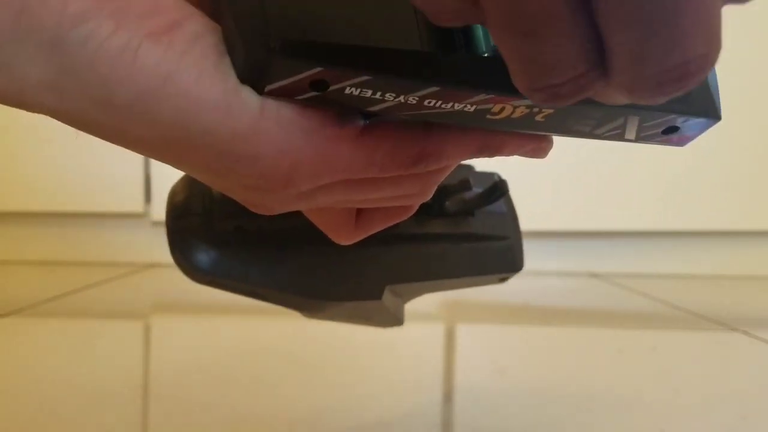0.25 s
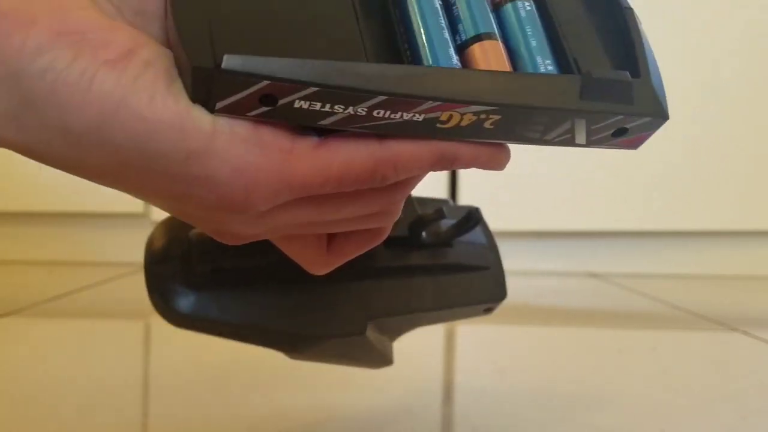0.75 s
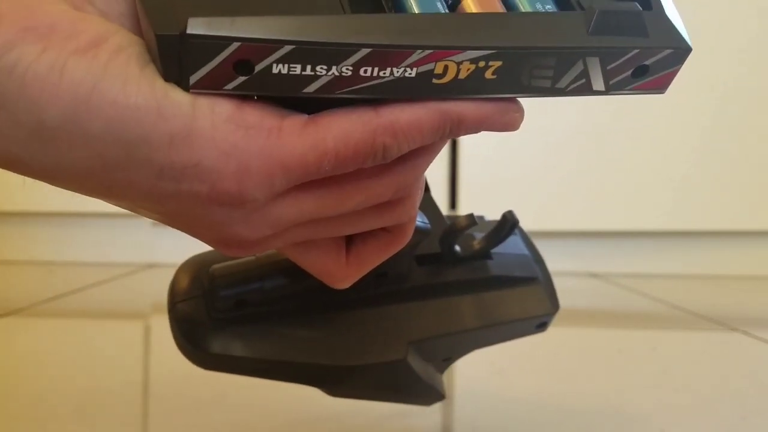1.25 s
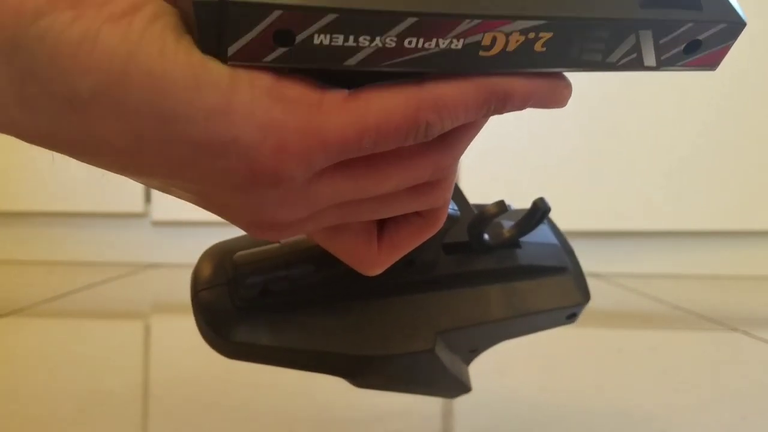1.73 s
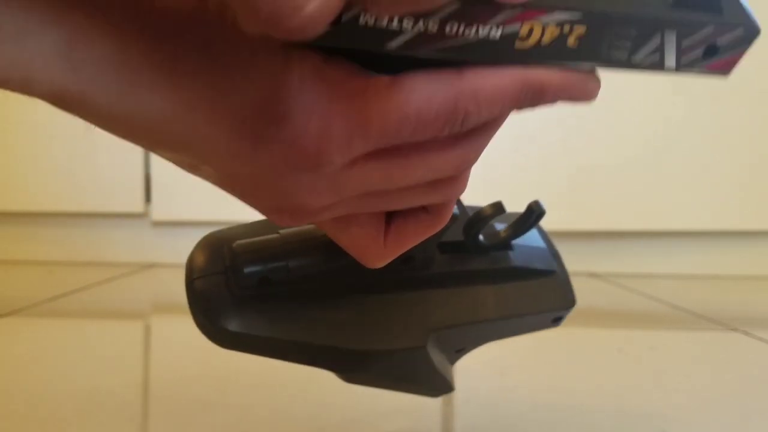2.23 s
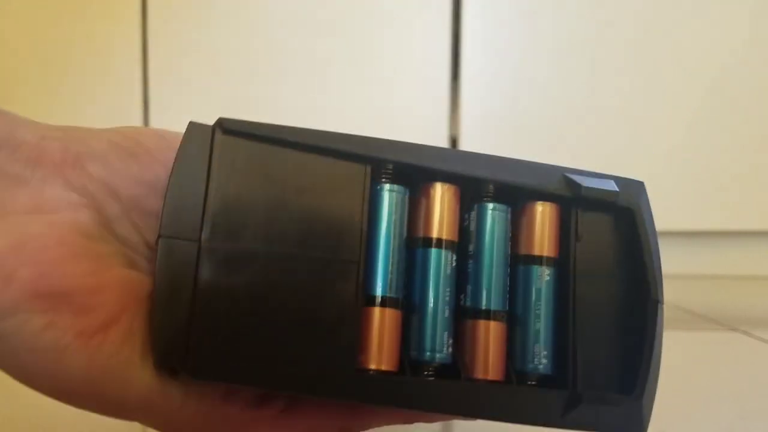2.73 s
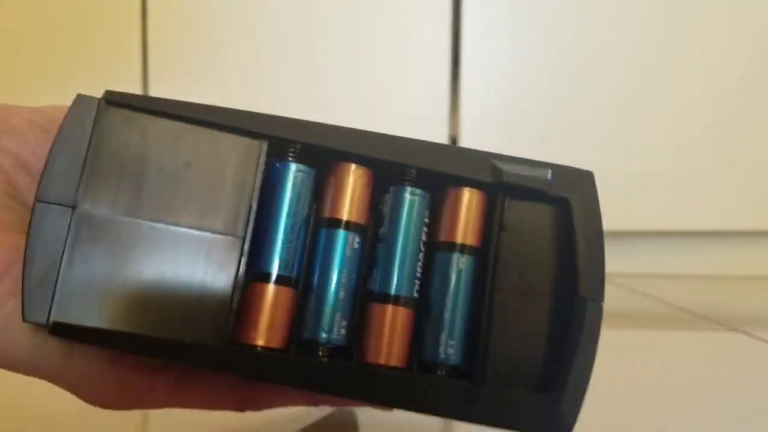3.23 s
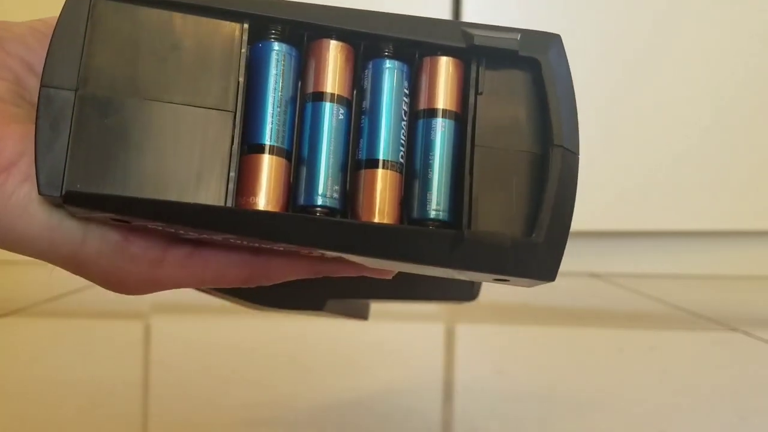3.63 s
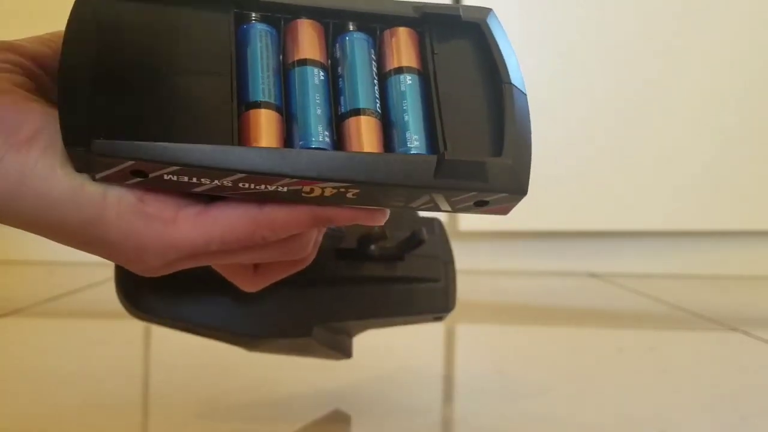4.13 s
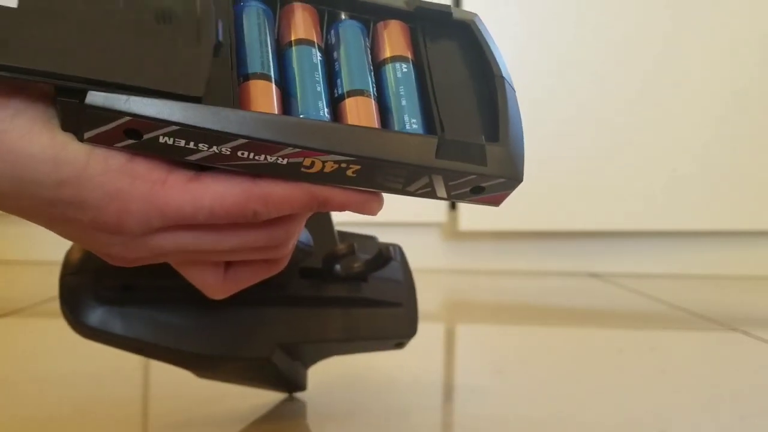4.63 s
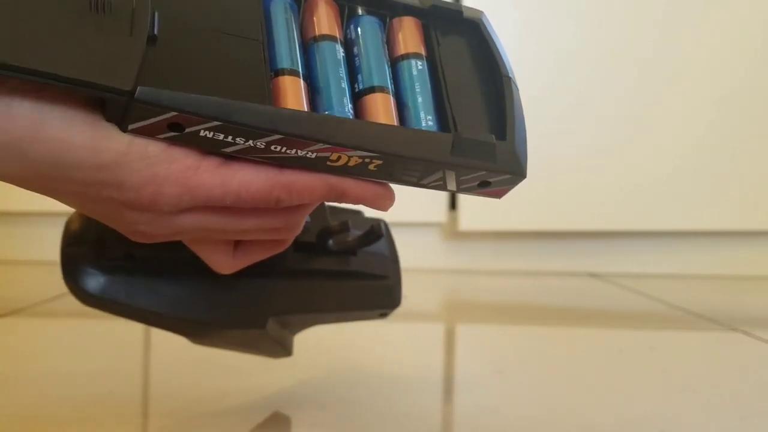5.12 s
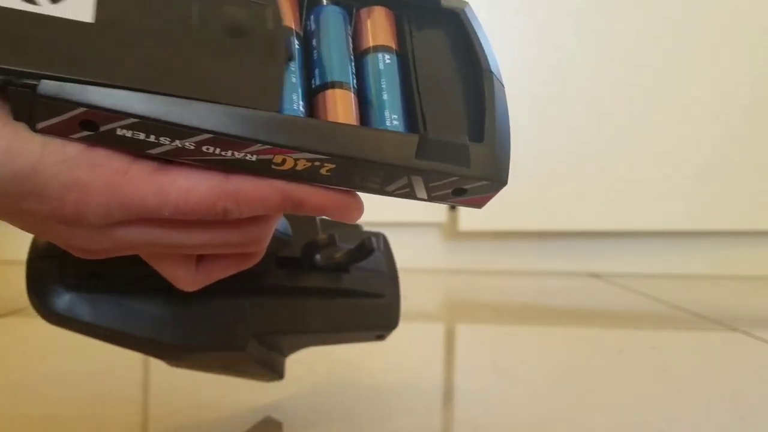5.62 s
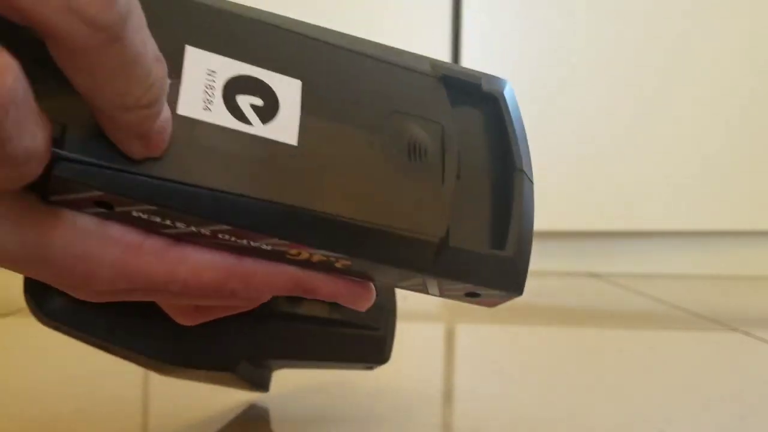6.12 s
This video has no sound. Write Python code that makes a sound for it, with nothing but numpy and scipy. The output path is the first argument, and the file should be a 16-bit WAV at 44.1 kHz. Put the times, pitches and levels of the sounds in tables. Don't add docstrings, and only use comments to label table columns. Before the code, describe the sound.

Hands press cells into a thin plastic handheld shell indoors. Hard dry clatter fills the first half second, then a near-silent gap with faint rubbing. Another burst of hollow clicks comes just after two seconds, then scattered small taps and scrapes, ending with a muted cluster as the cover slides and clicks. Close microphone, short room echo, soft hiss, low hum and distant engine drone.

```python
import sys
import numpy as np
from scipy import signal
from scipy.fft import rfft, irfft, next_fast_len
from scipy.io import wavfile
from scipy.ndimage import uniform_filter1d

SR = 44100
rng = np.random.default_rng(int(sys.argv[2]) if len(sys.argv) > 2 else 0)


def transcribe(signal):
    frames = np.atleast_2d(signal).T
    limited = np.clip(frames, -1, 1)
    pcm = np.round(limited * 32767).astype(np.int16)
    wavfile.write(sys.argv[1], SR, pcm)


def boost_factor(decibels):
    exponent = np.asarray(decibels, float) / 20
    return 10 ** exponent


N = 280781
HALVES = np.array([[0.5], [-0.5]])


def evened(x):
    return x / np.sqrt(np.mean(x ** 2) + 1e-20)


def levelled(x, span):
    return x / np.sqrt(np.mean(x[:, :span] ** 2))


def read(points, hz):
    f, value = np.transpose(points)
    return np.interp(np.log(hz + 1), np.log(f + 1), value)


def coloured(x, points):
    size = next_fast_len(x.shape[-1])
    gain = boost_factor(read(points, np.fft.rfftfreq(size, 1 / SR)))
    return irfft(rfft(x, size) * gain, size)[..., :x.shape[-1]]


# freq_hz, level_db (per Hz)
AIR = [(12, -41.5), (22, -15.5), (50, -2.5), (114, -0.5), (145, -7.5), (192, -2.5), (420, -14), (740, -16),
       (974, -11.5), (1600, -21), (2300, -27), (4000, -29), (4500, -37), (6500, -39), (11000, -47),
       (14500, -44)]
# freq_hz, likeness (-1..1)
SAME = [(60, 0.98), (130, 0.97), (290, 0.94), (640, 0.61), (1410, -0.014), (3100, -0.06), (6820, 0.24),
        (15000, -0.94)]
# time_s, level_db
RUMBLE = [(0, -56), (1.0, -61), (1.6, -61.5), (1.95, -66.5), (2.6, -60.5), (3.3, -63), (3.9, -64),
          (4.3, -60), (4.85, -63.5), (5.3, -62), (5.9, -63.5), (6.37, -63.5)]
# freq_hz, width_hz, level_db
HUM = [(100, 12, 0.5), (182, 25, 2)]
# time_s, pitch_hz, level_db (over the hum)
DRONE = [(0, 60, 9), (.5, 62, 9), (1.0, 72, 10), (1.5, 70, 10), (1.9, 66, 4), (2.3, 72, 8), (3.1, 64, 8),
         (3.6, 66, 3), (4.3, 56, 7), (4.8, 70, 7), (5.2, 88, 8), (5.5, 66, 5), (6.37, 63, 7)]
AIR_DB, DRONE_WIDTH_HZ, HOP = -58.5, 7, 512


def air():
    frames, hz = N // HOP + 5, np.fft.rfftfreq(2048, 1 / SR)
    frame_s = np.arange(frames) * HOP / SR
    a, b, c, d, patches = rng.standard_normal((frames, 1025, 5)).T
    patches = evened(uniform_filter1d(uniform_filter1d(patches, 20, 0), 7, 1))

    same = np.clip(read(SAME, hz), -1, 1)[:, None]
    left, other = a + 1j * b, c + 1j * d
    z = np.array([left, same * left + np.sqrt(1 - same ** 2) * other])

    time_s, level_db = np.transpose(RUMBLE)
    sway_db = np.interp(frame_s, time_s, level_db - level_db.mean())
    low = 1 / (1 + (hz[:, None] / 200) ** 2)
    hum_db = sum(db / (1 + ((hz - f) / width) ** 2) for f, width, db in HUM)

    time_s, pitch_hz, level_db = np.transpose(DRONE)
    pitch_hz = np.interp(frame_s, time_s, pitch_hz)
    level_db = np.interp(frame_s, time_s, level_db)
    drone_db = 0.6 * level_db / (1 + ((hz[:, None] - pitch_hz) / DRONE_WIDTH_HZ) ** 2)

    z *= boost_factor((read(AIR, hz) + hum_db)[:, None] + drone_db + 1.5 * patches + low * sway_db)
    noise = signal.istft(z, nperseg=2048, noverlap=2048 - HOP)[1][:, :N]
    return boost_factor(AIR_DB) * evened(noise)


def drone():
    time_s, pitch_hz, level_db = np.transpose(DRONE)
    t = np.arange(N) / SR
    drift, swell = (np.interp(t, np.arange(64) / 8, v) for v in rng.standard_normal((2, 64)))
    turns = np.cumsum(np.interp(t, time_s, pitch_hz) + 1.5 * drift) / SR
    return boost_factor(-71 + np.interp(t, time_s, level_db) + 2.5 * swell) * np.sin(2 * np.pi * turns)


# peak_s, level_db
GRIPS = [(0.02, -64), (1.35, -65), (2.52, -67), (3.27, -65.5), (3.72, -67), (3.96, -62.5), (4.24, -64.5),
         (4.64, -65), (5.3, -66.5), (5.8, -68), (6.27, -63)]
TIGHTEN_DB_PER_S, SETTLE_DB_PER_S, REST_DB = 45, 55, -84


def grip_db(t):
    peak_s, level_db = np.transpose(GRIPS)[:, :, None]
    slope = np.where(t < peak_s, TIGHTEN_DB_PER_S, SETTLE_DB_PER_S)
    return np.maximum((level_db - slope * abs(t - peak_s)).max(0), REST_DB)


# freq_hz, level_db (per Hz)
RUB = [(180, -33.5), (300, -3.5), (860, -5), (2100, -10.5), (4000, -15), (4600, -21.5), (7500, -27.5),
       (11000, -34), (14500, -27)]


def rubs():
    slips = boost_factor(2.5 * np.minimum(rng.exponential(1, N), 5)) * (rng.random(N) < 2500 / SR)
    grain = np.sqrt(abs(uniform_filter1d(slips ** 2, 60)) + 1e-9)
    x = evened(coloured(rng.standard_normal((2, N)) * grain, RUB))
    return boost_factor(grip_db(np.arange(N) / SR) + 0.5) * x


def rings(modes, struck_hz, t, chance, spread, focus_db):
    f, width, db, pan_db, lead = np.transpose(modes)[:, :, None]
    f = f * (1 + 0.015 * chance[0])
    off_octaves = abs(np.log2(f / struck_hz))
    size = boost_factor(db - focus_db * off_octaves + 3.4 * chance[1]) * np.exp(-np.pi * width * t)
    side = HALVES[:, :, None]
    turn = 2 * np.pi * f * t + side * (lead + spread * chance[3])
    return (size * boost_factor(side * (pan_db + 1.2 * chance[2])) * np.sin(turn)).sum(1)


# freq_hz, width_hz, level_db, left_right_db, left_lead_rad
SHELL = [(1060, 220, -5.5, 9, 1.9), (1530, 170, -4, 3.5, 2.7), (2020, 98, -6, 1.3, 0.54),
         (2300, 170, -1.45, 0, .3), (2560, 200, -5.5, -1, .4), (2880, 90, -10, -4, 0.86),
         (3060, 1000, -11, 0, 1.2), (3670, 300, -13.5, 7, 4.8), (4860, 280, -17.5, 6, 1.6)]
# freq_hz, width_hz, level_db, left_right_db, left_lead_rad
CAVITY = [(300, 240, -3.5, 0.1, .15), (493, 110, 0.5, 0.1, 1.8), (814, 280, 4, 1.4, 1.3)]
# freq_hz, level_db (per Hz)
TICK = [(2060, -25), (3500, -1.5), (4060, -1), (4570, -7), (5000, -5.5), (6050, -10), (8340, -9.5),
        (11000, -21.5), (14500, -17)]
# freq_hz, level_db
RADIATES = [(60, -36), (180, -11), (330, -5), (4500, -2.5), (7000, -12), (15000, -27)]
# time_s, left_right_db
HANDS = [(0.18, 0.5), (0.414, 4), (0.62, -0.5), (1.24, -6), (2.0, 0.5), (3.1, -1), (3.244, 4.5), (3.6, 1.0),
         (3.83, 15.5), (4.75, -1), (5.2, -2.5), (5.68, 5), (6.367, 0)]
# start_s, hollow_db, grit_db, sheen_db (above 8 kHz)
SHADES = [(0, 2, 1, 4), (.21, 0, -1, 4), (.3, 4, 2, -2), (.322, -2, -1, 2), (.342, 3, 0, 0),
          (.39, -1, -1, 2), (.41, 0, -3, 7), (.5, -3, -11, 5), (.53, 0, -1, -2), (.545, 0, 3, 0),
          (.565, -2, 4, 0), (.58, 2, 5, -5), (.7, 0, 0, 0), (1.1, 1, -1, 6), (2.0, 0, 2, -5),
          (2.05, 2, 0, 3), (2.1, 0, 1, 4), (2.13, 1, -1, 3), (2.16, 4, 0, 2), (2.2, 0, -9, 9),
          (2.276, 0, 0, -1), (2.33, 2, -2, -1), (2.44, -8, 2, -2), (2.49, 1, 5, -5), (3.0, 0, 7, -12),
          (3.18, 0, 2, 1), (3.6, 0, -3, -2), (3.7, -3, 0, 0), (3.9, -8, 0, 0), (3.93, 0, 0, 1),
          (4.2, -2, 4, -7), (4.24, 1, -8, 5), (4.55, -3, -2, 0), (4.6, 2, -2, 5), (4.64, 0, 0, 0),
          (4.68, -1, 3, -4), (5.2, 0, 0, 1), (5.36, 1, -1, 5), (5.45, 1, 0, 8), (5.54, 0, -1, -2),
          (5.62, 2, 2, -2), (5.71, -6, 1, -4), (5.752, 5, -1, -7), (5.765, -1, 0, -4), (5.778, 5, 5, -2),
          (5.805, 0, 0, -5), (5.855, 0, 4, 12), (5.9, 3, -1, 6), (6.0, 0, -3, 4), (6.2, 2, 2, -5)]


def strikes(rows):
    t, out = np.arange(3072) / SR, np.zeros((2, N + 3072))
    ring_t = t[:1024]
    draws = rng.standard_normal((len(rows), 4, 16, 1))
    noises = rng.standard_normal((len(rows), 4, len(t)))
    hands, shades = np.transpose(HANDS), np.array(SHADES)
    end_fade = np.clip((t[-1] - 0.006 - t) / 0.004, 0, 1)
    for row, chance, (touch, lumps, left, right) in zip(rows, draws, noises):
        start_s, length_ms, level_db, ring_hz, thump_db, tick_db = row
        _, hollow_db, grit_db, sheen_db = shades[np.searchsorted(shades[:, 0], start_s) - 1]
        span = round((length_ms + 1.5) * SR / 1000)

        done = np.minimum(t / (max(length_ms, 1) / 1000), 1)
        swell = np.sin(np.pi * done ** (0.51 + length_ms / 60)) ** 0.83
        pressure = swell * boost_factor(2.1 * evened(uniform_filter1d(lumps, 60)))
        chatter = (touch * abs(touch) ** 0.86 * pressure)[None]

        modes = SHELL + [(ring_hz, 400, -1.5, 0.1, 0.6)]
        walls = rings(modes, ring_hz, ring_t, chance[:, :len(modes)], 0.74, 21.0)
        hollow = rings(CAVITY, 480, ring_t, chance[:, -len(CAVITY):], 0.12, 0)
        walls, hollow = (signal.fftconvolve(x, chatter)[:, :len(t)] for x in (walls, hollow))
        body = levelled(walls, span) + boost_factor(thump_db + hollow_db + 0.5) * levelled(hollow, span)

        grit = np.array([left, right]) * (pressure + 0.1 * done * np.exp(-t / 0.008))
        dull_db = -0.25 * length_ms
        grit = coloured(coloured(grit, TICK), [(5500, 0), (8000, dull_db), (10000, sheen_db + dull_db)])

        sound = coloured(body, RADIATES) + boost_factor(tick_db + grit_db) * levelled(grit, span)
        gain = boost_factor(level_db - 3.0 + HALVES * np.interp(start_s, *hands))
        at = round(start_s * SR)
        out[:, at:at + len(t)] += gain * sound * end_fade
    return out[:, :N]


# start_s, length_ms, level_db, ring_hz
KNOCKS = [(0.2017, 2.2, -34, 1800), (0.2045, 8.9, -34, 1750), (0.343, 15, -44, 1970),
          (0.4165, 5.6, -35, 2100), (0.42, 17, -42.5, 2120), (1.49, 35, -61, 1296),
          (2.116, 18, -43.5, 2500), (2.1336, 12, -36, 2010), (2.24, 12.5, -48.5, 1970),
          (2.258, 13, -52, 920), (2.282, 2.7, -30.5, 2520), (2.29, 6, -37, 2700), (2.3407, 6.7, -35, 1040),
          (2.572, 10, -59, 1700), (2.657, 13, -59, 1420), (3.108, 29, -62, 1314), (3.243, 23, -53, 1220),
          (4.231, 4.8, -46, 1660), (4.468, 37, -60, 1330), (4.577, 30, -54.5, 2240), (4.677, 10, -53, 1400),
          (4.693, 25, -60, 2650), (5.215, 3.9, -49.5, 910), (5.583, 13, -55.5, 1230),
          (5.737, 20, -48.5, 2000), (5.789, 11, -38, 1810), (5.944, 15, -56, 1070), (6.283, 21, -51, 980),
          (6.299, 26, -63, 1240)]
# start_s, length_ms, level_db, ring_hz
SNAPS = [(0.2148, 7.5, -28, 2650), (0.316, 12.4, -34, 2470), (0.3253, 11.2, -24, 2440),
         (0.331, 7.2, -23.5, 2470), (0.336, 6.8, -23, 1840), (0.4012, 9, -43, 2250),
         (0.434, 9.6, -48.5, 2190), (0.5145, 7, -37, 2630), (0.5366, 7.1, -21, 2460),
         (0.547, 11, -28, 2220), (0.5524, 8.8, -17.5, 2320), (0.5555, 7, -24, 2180),
         (2.14, 13.2, -32, 1850), (2.148, 5.6, -36, 1930), (2.465, 5.3, -38.5, 1930),
         (3.1733, 2.5, -37, 1700), (3.175, 3, -38, 1300), (5.718, 35, -56.5, 1730), (5.781, 11, -34, 2050)]
# start_s, length_ms, level_db, ring_hz, hollow_rel_db, grit_rel_db
SLIPS = [(.51, 8, -48, 2600, -20, -22), (.523, 10, -46, 2700, -20, -22), (.805, 14, -56, 1300, -10, -22),
         (1.045, 12, -72, 3900, -5, -6), (2.035, 22, -55, 2300, -3, -6), (2.269, 9, -49, 2400, -20, -18),
         (3.7, 12, -55, 1750, -20, -6), (3.815, 18, -81, 5800, -20, 3), (3.745, 25, -62, 1700, -20, -10),
         (4.236, 8, -50, 2400, -8, -10), (5.595, 10, -60, 3500, -5, -3), (5.738, 6, -51, 2600, -8, -4),
         (5.76, 4, -48, 1300, 1, -10), (5.794, 6, -49, 1500, 0, -12), (5.831, 4, -60, 2500, -10, 0),
         (5.915, 5, -52, 1500, -3, -6), (5.81, 16, -61, 2200, -5, -5)]
# start_s, length_ms, level_db, ring_hz
RATTLES = [(0.5336, 5.5, -19, 2300), (0.541, 11.4, -28, 2100), (0.56, 16, -27, 2650),
           (0.569, 13.7, -26, 2900), (0.584, 18, -41, 2700), (0.598, 19, -48.5, 2964),
           (2.45, 23, -51.5, 1930), (2.472, 20, -53, 2040), (3.167, 5.9, -62, 1300),
           (3.706, 34.6, -53.5, 1705), (3.73, 29, -59, 1720), (3.9195, 4.6, -44, 2280),
           (3.922, 9.1, -41.5, 2380), (4.244, 4.5, -43, 2900), (4.6872, 2.03, -38, 2300),
           (5.635, 32, -53, 2140), (5.655, 29, -49, 2010), (5.757, 17, -45.5, 1750)]
# start_s, length_ms, level_db, ring_hz
SCRAPES = [(1.2, 59, -58.5, 1470), (1.255, 25, -52, 1330), (1.28, 46, -57, 1790), (1.325, 40, -61.5, 1200),
           (2.0125, 4.9, -46.5, 2300), (2.017, 18.3, -47, 2440), (2.059, 26, -47, 2400),
           (2.083, 28, -56, 2380), (2.169, 6.1, -49, 1910), (2.285, 4.8, -26, 2300), (2.345, 16, -44, 1360),
           (2.497, 32, -54, 1520), (3.188, 19, -51, 1430), (3.215, 31, -59, 1450), (3.63, 16, -61, 1720),
           (4.227, 5.4, -38.5, 2140), (4.649, 6.4, -48.5, 1430), (5.375, 46, -57.5, 1200),
           (5.465, 37, -56, 2030), (5.772, 7, -38.5, 2600), (5.842, 7.9, -50, 1010),
           (5.906, 22.6, -53.5, 1420), (6.033, 18.5, -50.5, 1190), (6.05, 37, -60, 1380),
           (6.249, 12, -57, 1950)]
# start_s, length_ms, level_db, ring_hz
TICKS = [(3.694, 5.7, -59, 1820), (3.934, 23, -63, 1850), (4.25, 25, -68, 2220), (4.5892, 4.1, -46, 3060),
         (4.594, 13.5, -49, 3150), (4.605, 5, -49, 3400), (4.61, 24, -57, 3420), (5.245, 29, -66, 1720),
         (5.486, 39, -63, 1930), (5.549, 26.4, -58, 1980), (5.86, 3.5, -65, 3000), (5.924, 22, -60.5, 1510)]
# hollow_rel_db, grit_rel_db
KINDS = [
    (-26.5, -19),
    (-22, -8.5),
    (0.5, -19),
    (1.5, -9.5),
    (-5, 0),
]


def contacts():
    tables = (SNAPS, RATTLES, KNOCKS, SCRAPES, TICKS)
    rows = [row + kind for table, kind in zip(tables, KINDS) for row in table]
    return strikes(rows) + strikes(SLIPS)


# start_s,
# pitch_hz, level_db, t60_s, left_right_db
PINGS = [(.2022, 1900, -22.5, 0.01, 4), (4.228, 1900, -39, 0.029, 6), (0.5333, 2610, -22, .015, 0),
         (2.285, 2600, -35, 0.023, 0), (3.174, 590, -36, 0.02, 3), (.328, 2900, -32.5, 0.036, -10),
         (2.142, 500, -31.5, 0.051, 3), (1.103, 530, -53, 0.15, -6), (2.285, 342, -29, 0.031, 8.5),
         (2.507, 210, -52, 0.065, 8), (2.905, 540, -47, 0.028, 9), (3.696, 1774, -40.5, 0.026, 9),
         (3.919, 10900, -56, 0.06, -0.5), (4.229, 954, -35.5, 0.028, 4), (4.228, 2910, -32.5, 0.022, 8),
         (4.24, 3950, -53, 0.081, -7), (4.605, 3980, -49, 0.057, 0), (4.602, 3140, -52, 0.057, -6),
         (4.687, 830, -41, 0.023, 11.5), (5.384, 310, -45, 0.028, 0), (5.42, 480, -53, 0.14, -6),
         (5.943, 238, -40, 0.048, 0), (5.59, 600, -48, 0.025, -6),
         (.5337, 2950, -19, .012, 3.5), (.5388, 2570, -20, .015, 2), (.5558, 2240, -15, .012, 0),
         (.555, 1100, -27, .03, 8), (.536, 1050, -32, .03, 8), (.5665, 3300, -30, .02, 0),
         (.568, 1150, -38, .08, 8), (3.1745, 2600, -32, .015, 5), (3.179, 2900, -52, .07, 5),
         (4.2275, 2950, -31, .015, 7), (3.9205, 2450, -36, .02, 7), (.418, 2200, -36, .03, 4),
         (.2025, 1200, -32, .015, 4), (5.86, 1200, -47, .015, 0), (3.935, 1300, -54, .06, 5),
         (6.1, 650, -56, .12, 0), (3.1737, 1200, -20, .008, 5), (4.2277, 2400, -40, .02, 7),
         (4.59, 3900, -42, .012, 2), (4.6065, 3800, -41, .012, -2), (4.6875, 2250, -39, .015, 0),
         (2.283, 2400, -31, .01, 1.5), (2.283, 560, -33, .03, 3), (2.283, 125, -38, .06, 0),
         (2.1695, 520, -38, .025, 3), (5.792, 680, -33, .025, 5), (5.784, 2070, -33, .015, 7),
         (3.696, 5900, -58, .02, 5), (4.212, 140, -50, .04, 0), (5.4, 140, -48, .06, 0),
         (2.3435, 700, -38, .02, 2), (.2155, 2600, -36, .05, 1), (6.06, 700, -50, .03, 3)]


def pings():
    t, out = np.arange(6000) / SR, np.zeros((2, N))
    for start_s, pitch_hz, level_db, t60_s, pan_db in PINGS:
        tone = np.sin(2 * np.pi * pitch_hz * t) + 0.51 * np.sin(2 * np.pi * pitch_hz * 0.92 * t)
        buzz_db = 2.5 * evened(uniform_filter1d(rng.standard_normal(len(t)), 200))
        tone *= boost_factor(level_db - 60 * t / t60_s + buzz_db) * (1 - np.exp(-t * pitch_hz))
        at = round(start_s * SR)
        out[:, at:at + len(t)] += boost_factor(HALVES * pan_db) * tone
    return out


# freq_hz, t60_s
ROOM = [(250, 0.13), (800, 0.12), (2000, 0.16), (6000, 0.17), (12000, 0.14)]


def room():
    taps = np.zeros((2, SR // 2))
    starts = np.arange(150, SR // 2 - 20, 20)
    at = starts + rng.integers(0, 20, (2, len(starts)))
    np.put_along_axis(taps, at, rng.choice([-1., 1.], at.shape), 1)
    hz, t, z = signal.stft(taps, SR, nperseg=256)
    tail = signal.istft(z * boost_factor(-60 * t / read(ROOM, hz)[:, None]), SR, nperseg=256)[1]
    return tail / np.linalg.norm(tail[0])


def scene():
    bed = air() + drone() + rubs()
    hits = contacts() + pings()
    echo = signal.fftconvolve(hits, room(), axes=1)[:, :N]
    return bed + hits + boost_factor(-12) * echo


SINK_AT_S, SINK_S, SINK_DB, RISE_AT_S, RISE_S, USUAL_DB = 0.53, 0.08, 16, 0.87, 0.093, 2


def gain_control_db(t):
    sunk = 1 - np.exp(-np.maximum(t - SINK_AT_S, 0) / SINK_S)
    return USUAL_DB - SINK_DB * sunk * np.exp(-np.maximum(t - RISE_AT_S, 0) / RISE_S)


# freq_hz, left_db, right_db
PORTS = [(6030, -2, -1), (7070, -2.5, -9.5), (8370, -18.5, -9.5), (8700, -16, -3), (9330, -11, 1.5),
         (11210, 7, 8), (14550, 3.5, 0), (14750, -17.5, -17.5), (16000, -26.5, -26)]
# freq_hz, level_db
CIRCUIT = [(300, -99), (2500, -88), (5000, -98), (14500, -100), (14800, -130)]


def top_cut(x):
    return signal.sosfilt(signal.butter(12, 15890, fs=SR, output="sos"), x)


def record(dry):
    hz, left_db, right_db = np.transpose(PORTS)
    ports = np.array([coloured(x, np.transpose([hz, db])) for x, db in zip(dry, (left_db, right_db))])
    gained = ports * boost_factor(gain_control_db(np.arange(N) / SR))
    hiss = coloured(rng.standard_normal(dry.shape), CIRCUIT)
    return top_cut(gained + hiss)


dry = scene()
out = record(dry)
transcribe(out)
```